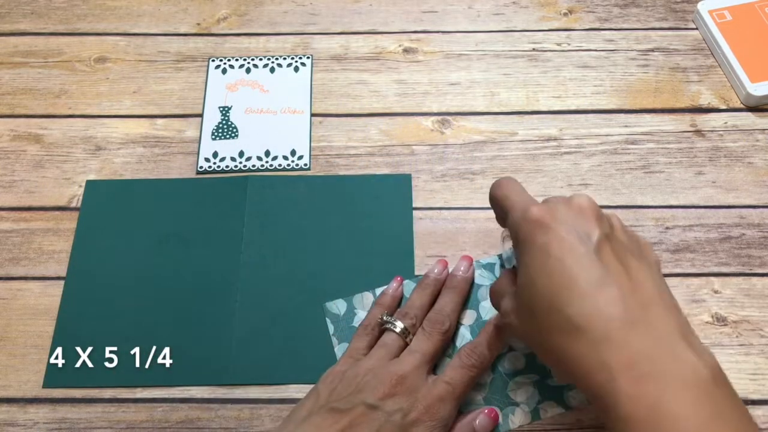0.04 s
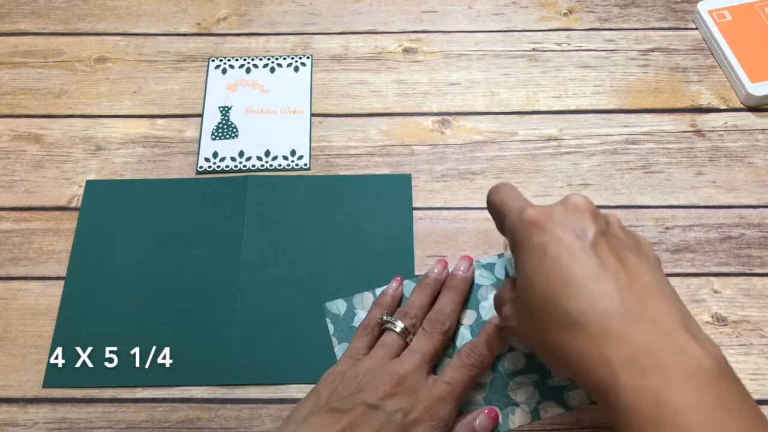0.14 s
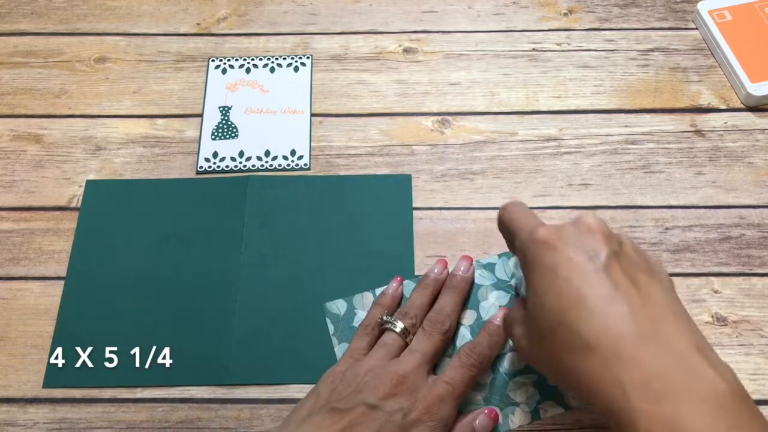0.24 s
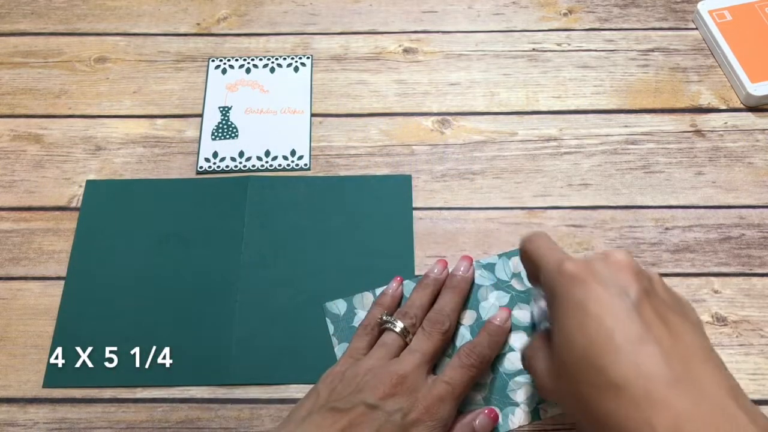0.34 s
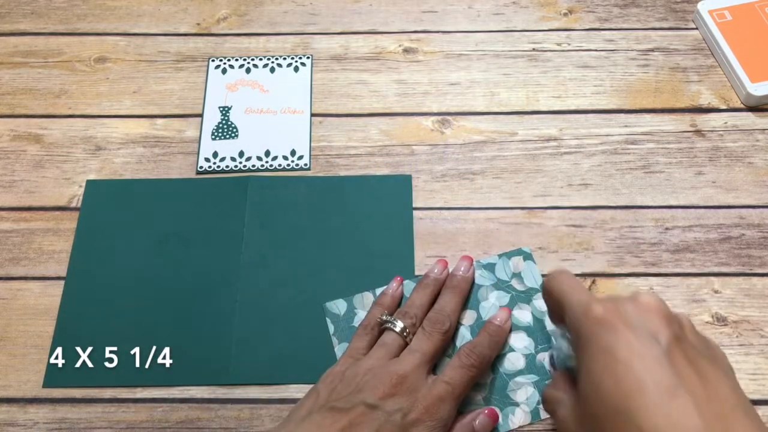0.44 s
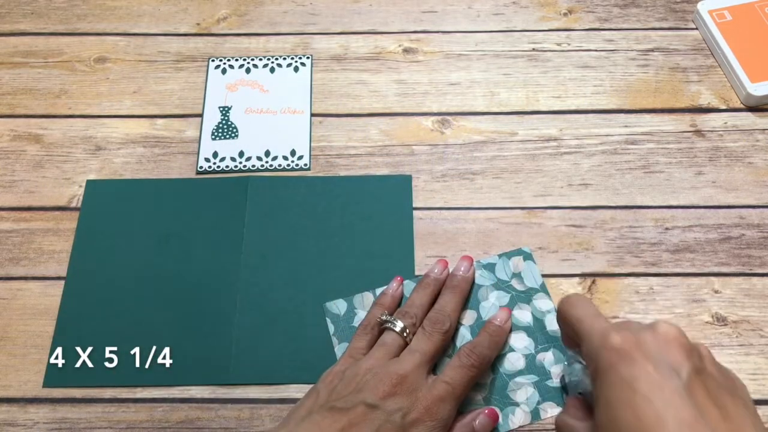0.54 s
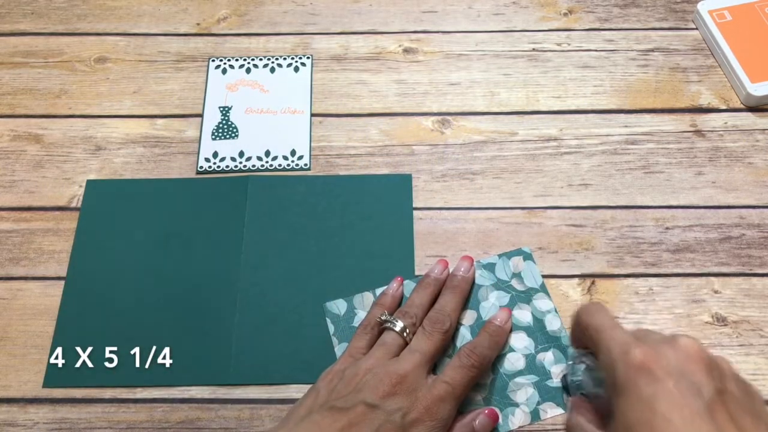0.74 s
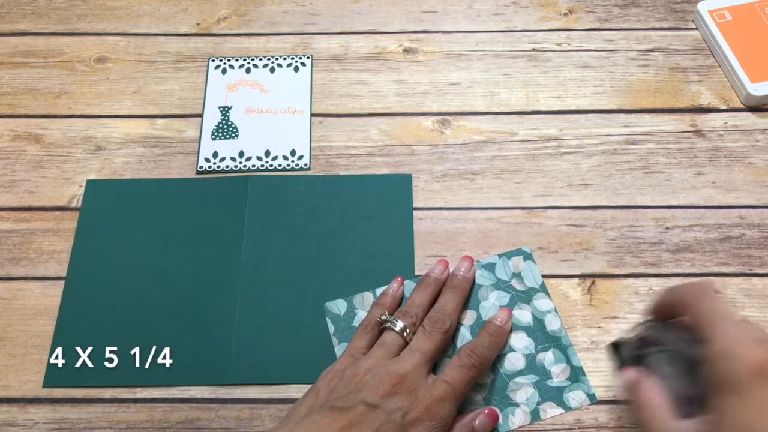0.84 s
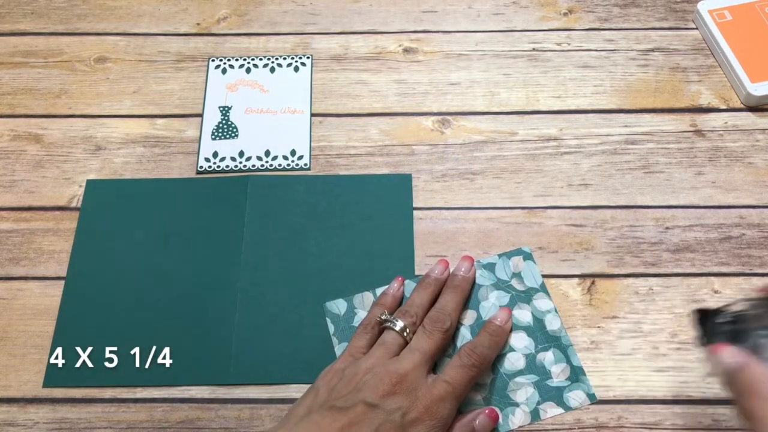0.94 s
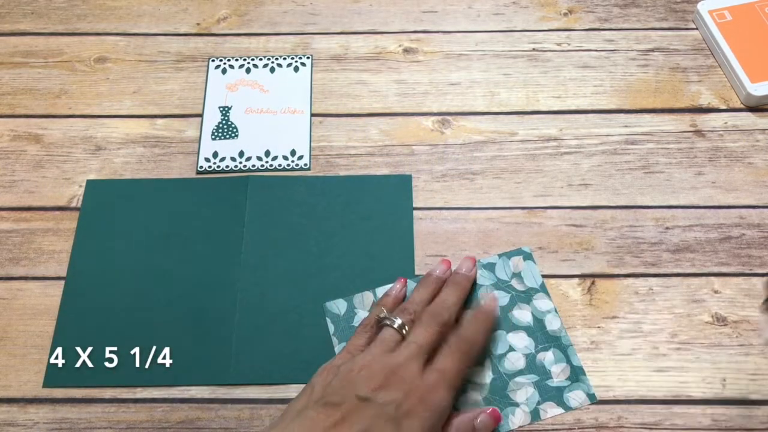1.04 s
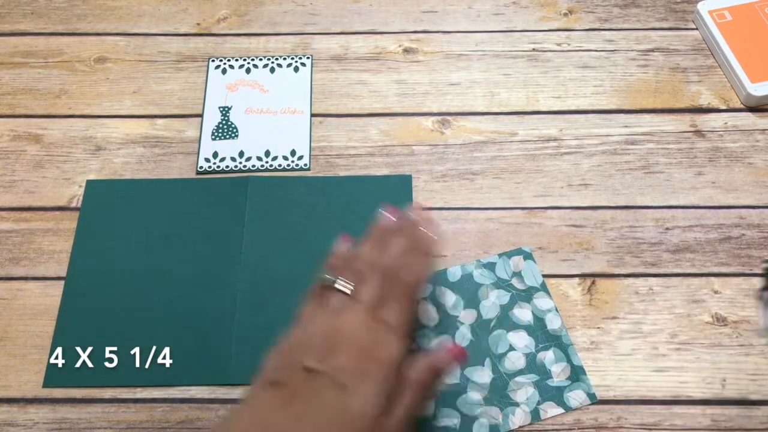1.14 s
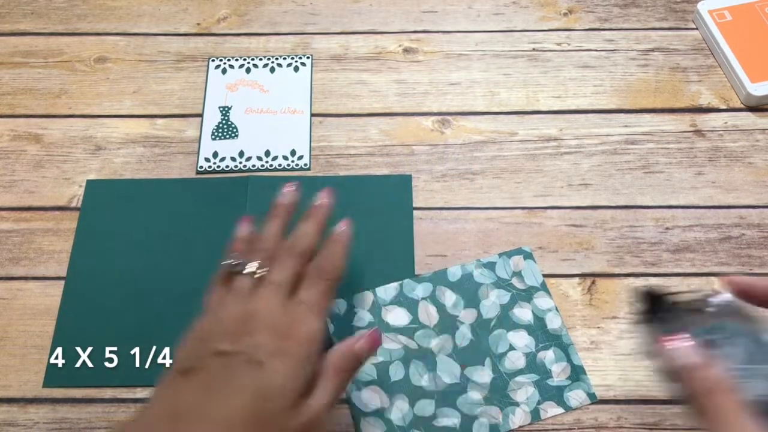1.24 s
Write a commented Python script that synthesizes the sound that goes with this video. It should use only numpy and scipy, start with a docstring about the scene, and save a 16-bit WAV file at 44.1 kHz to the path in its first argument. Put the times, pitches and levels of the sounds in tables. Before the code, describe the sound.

A small hand tool scrapes briefly along paper on a wooden table, then ticks lightly.

```python
"""Light rubbing, a thin squeak and small ticks, then one short, raspy scrape in a small room.
A small plastic hand tool is set down, nudged and dragged along the edge of a card panel on a wooden
table. It sticks and slips through one stroke that speeds up and slows again; each slip snaps, rasps
and rings the tool. Light taps and rustles follow as it lifts off, and a hand slides softly away."""
import sys
import numpy as np
from scipy import signal
from scipy.io import wavfile
from scipy.ndimage import map_coordinates

SR = 44100
rng = np.random.default_rng(int(sys.argv[2]) if len(sys.argv) > 2 else 0)


def pcm_store(signal):
    """Save signal as 16-bit PCM."""
    levels = np.round(np.clip(np.atleast_2d(signal), -1, 1) * 32767)
    wavfile.write(sys.argv[1], SR, levels.astype(np.int16).T)


N = 57330
TIME = np.arange(N) / SR
BRIEF = np.arange(2048) / SR  # time axis of one short sound, in seconds
TAP_RISE_S = .001


def amp(db):
    """Turns decibels into a gain to multiply by."""
    return 10 ** (np.asarray(db) / 20)


def unit(x):
    """Scales a sound to an average (rms) level of 1."""
    return x / np.sqrt(np.mean(x ** 2) + 1e-20)


def unit_burst(x):
    """Scales a short sound to the energy of 7 ms at level 1."""
    return x / np.sqrt(np.sum(x ** 2) / (.007 * SR) + 1e-20)


def along(table, s):
    """Reads each column of a table at the times s, gliding between rows."""
    times, *columns = np.transpose(table)
    return [np.interp(s, times, column) for column in columns]


def across(table, hz):
    """Reads a table at the frequencies hz, with octaves evenly spaced."""
    frequencies, values = np.transpose(table)
    return np.interp(np.log(hz + 1), np.log(frequencies), values)


def colour(x, db_at):
    """Turns each frequency up or down by db_at(hz) decibels, with no ringing ahead of the sound."""
    hz = abs(np.fft.fftfreq(4096, 1 / SR))
    log_gain = np.log(amp(db_at(hz)))
    spectrum = np.exp(np.conj(signal.hilbert(log_gain)))
    response = np.fft.ifft(spectrum).real[:len(BRIEF)]
    return signal.fftconvolve(x, response)[:len(x)]


def shaped(x, table):
    """Colours a sound by a table of frequencies and levels."""
    return colour(x, lambda hz: across(table, hz))


def add(mix, s, sound):
    """Mixes a sound in, starting at s seconds."""
    part = mix[max(round(s * SR), 0):][:len(sound)]
    part += sound[:len(part)]


def fibres(size, clicks_per_s=7000, spread_db=3):
    """Paper fibres catch and let go, making dense clicks of uneven size."""
    hits = rng.random(size) < clicks_per_s / SR
    signs = rng.choice([-1., 1.], size)
    return hits * signs * amp(spread_db * np.minimum(rng.exponential(1, size), 3))


def rubbing():
    """Tool and fingers slide lightly over the card's fibres."""
    # strength of the rubbing: t/s, body level/dB, hiss level/dB
    levels = [(0, -46, -57), (.061, -58.5, -62), (.067, -45.5, -48.5), (.1, -49, -65), (.128, -41, -81),
              (.145, -55.5, -88), (.1845, -60, -73), (.186, -48.5, -60.5), (.235, -40, -47.5),
              (.46, -36, -40.5), (.615, -38, -50), (.645, -46.5, -52), (.73, -66, -100), (.765, -42.5, -84),
              (.802, -95, -86), (.808, -51, -57), (.875, -62.5, -68), (.895, -96, -112),
              (1.1, -84.5, -81.5), (1.117, -71, -64), (1.15, -82.5, -81)]
    # tone of the rubbing's body: f/Hz, level/dB
    body_colour = [(200, -26), (600, -11.5), (1100, -14.5), (1450, 6.5), (1900, 4.5), (2250, 1), (2700, 4),
                   (3300, -0.5), (4200, 1), (5000, 2.5), (6300, -14), (16000, -35)]
    # tone of its hiss: f/Hz, level/dB
    hiss_colour = [(1000, -30), (4000, 0), (6000, 3.5), (8500, -3), (11500, -3.5), (13500, 0), (16000, -11)]
    body_db, hiss_db = along(levels, TIME)
    body = amp(body_db) * unit(shaped(fibres(N), body_colour))
    hiss = amp(hiss_db) * unit(shaped(fibres(N), hiss_colour))
    return body + hiss


def band_noise(low_hz, high_hz):
    """Noise between two frequencies, at level 1."""
    band = signal.butter(2, [low_hz, high_hz], "band", fs=SR, output="sos")
    return unit(signal.sosfilt(band, rng.standard_normal(N)))


def squeak(end_s=.11, db=-52, hz=2630, width_hz=120):
    """The tool's edge rubs with a thin squeak that fades as it settles."""
    fade = np.sqrt(np.maximum(1 - (TIME / end_s) ** 2, 0))
    return amp(db) * fade * band_noise(hz - width_hz / 2, hz + width_hz / 2)


def background(still_db=-67.5):
    """Shifting hands sound dully through the table, over the hush of the room."""
    # strength of the hand noise: t/s, level/dB
    hand_levels = [(0, -53), (.18, -64), (.26, -55.5), (.56, -56), (.66, -62.5), (.9, -66), (1.29, -69)]
    # its dull tone: f/Hz, level/dB
    hand_colour = [(25, -36.5), (60, -14.5), (110, -2.5), (200, 2), (420, -2), (700, -11.5), (1200, -26.5),
                   (4000, -46.5)]
    # tone of the still room: f/Hz, level/dB
    still_colour = [(20, -37), (70, -18.5), (110, 3), (200, -2), (400, -16.5), (2000, -20), (9000, -31.5),
                    (16000, -46)]
    hands = amp(along(hand_levels, TIME)[0]) * unit(shaped(rng.standard_normal(N), hand_colour))
    return hands + amp(still_db) * unit(shaped(rng.standard_normal(N), still_colour))


def taps(crack_db=-24):
    """Tool and fingernails tick dryly, each tick a puff of noise around one pitch."""
    # the ticks: t/s, level/dB, centre f/Hz, width/octaves, decay/s
    ticks = [(0.0633, -47, 4340, 0.32, 0.0019), (0.0805, -52, 650, 0.27, 0.0013),
             (0.7097, -36, 2970, 0.17, 0.00043), (0.7306, -43, 2850, 0.21, .0016),
             (0.731, -51.5, 6600, 0.15, 0.00084), (0.7418, -40.5, 2750, 0.58, 0.004),
             (.744, -54.5, 520, 0.24, 0.014), (0.7434, -45.5, 9900, 0.18, 0.0038),
             (0.7554, -51, 3000, 0.96, 0.0017), (0.7891, -46, 2500, 0.37, 0.0027),
             (0.8376, -41, 6600, 0.38, 0.0022), (0.857, -48.5, 5840, 0.055, 0.00073),
             (0.867, -50, 5500, 0.056, 0.00025), (0.874, -56, 6730, 0.39, 0.00099),
             (0.8742, -52, 2840, 0.24, 0.0037), (.919, -57.5, 6260, 0.32, 0.0018),
             (1.115, -58, 13090, 0.21, 0.0036)]
    out = np.zeros(N)
    for s, db, centre_hz, octaves, decay_s in ticks:
        def hump(hz):
            """One resonance with a broad, faint crack around it, in dB."""
            octaves_away = np.log2((hz + 1) / centre_hz)
            peak = np.exp(-.5 * (octaves_away / octaves) ** 2)
            crack = amp(crack_db) / (1 + (octaves_away - .5) ** 4)
            return 20 * np.log10(peak + crack)
        puff = envelope(TAP_RISE_S, TAP_RISE_S, decay_s) * rng.standard_normal(len(BRIEF))
        add(out, s, amp(db) * unit_burst(colour(puff, hump)))
    return out


def envelope(rise_s, hold_until_s, decay_s):
    """The outline of a short sound: it rises, holds and dies away."""
    return np.minimum(BRIEF / rise_s, 1) * np.exp(-np.maximum(BRIEF - hold_until_s, 0) / decay_s)


def flurry(rise_s, hold_until_s, decay_s, stretch=1):
    """A brief rush of fibre clicks; stretch multiplies its length."""
    return fibres(len(BRIEF)) * envelope(stretch * rise_s, stretch * hold_until_s, stretch * decay_s)


def ringing(modes):
    """A struck object rings at its own tones (modes); the wider a mode, the sooner it dies."""
    return sum(amp(db) * np.exp(-np.pi * width_hz * BRIEF) * np.sin(2 * np.pi * hz * BRIEF)
               for hz, width_hz, db in modes)


def slip(ring_db, rasp_db, snap_db, stretch=1):
    """The tool lets go with a bright snap, rasps forward and rings."""
    # tones of the tool on the card: f/Hz, width/Hz, level/dB
    tool_modes = [(1490, 110, 0.5), (1820, 195, 5)]
    # tone of the rasp: f/Hz, level/dB
    rasp_colour = [(40, -66.5), (300, -26.5), (1000, -18), (1400, -12), (2000, -4.5), (2350, -12),
                   (2700, -2.5), (3150, 1), (3800, -4), (4800, -3.5), (5250, -5), (5850, -2.5), (6500, -19),
                   (8500, -13), (11000, -21), (16000, -38.5)]
    # tone of the snap: f/Hz, level/dB
    snap_colour = [(40, -37.5), (300, -19), (2000, -1.5), (5000, -16.5), (6800, 7.5), (7400, 0.5),
                   (8500, 9.5), (10000, -4), (12000, 6.5), (16000, 5.5)]
    drift = .047  # the tones shift by up to this share from slip to slip as the contact moves
    modes = [(hz * (1 + drift * rng.uniform(-1, 1)), width, db) for hz, width, db in tool_modes]
    low_cut = signal.butter(6, 1236, "high", fs=SR, output="sos")  # a small tool gives off little bass
    body = signal.sosfilt(low_cut, ringing(modes))
    ring = signal.fftconvolve(flurry(.002, .0037, .0007), body)[:len(BRIEF)]
    rasp = shaped(flurry(.0015, .0043, .0012, stretch), rasp_colour)
    snap = shaped(flurry(.0004, .0025, .0017, stretch), snap_colour)
    return (amp(ring_db) * unit_burst(ring) + amp(rasp_db) * unit_burst(rasp)
            + amp(snap_db) * unit_burst(snap))


def scrape(start_s=.2394, end_s=.62):
    """A few nudges, then a run of slips that lengthen and merge in the fast part of the stroke."""
    # small slips as the tool settles: t/s, ring level/dB, rasp level/dB, snap level/dB
    nudges = [(0.097, -40.5, -54.5, -83.5), (0.1134, -39, -60, -66), (0.1206, -38.5, -41.5, -65.5),
              (0.2281, -36, -54, -43)]
    # speed of the stroke: t/s, slip rate/Hz
    slip_rate = [(.24, 52.22), (.2805, 40.54), (.3229, 59.93), (.3481, 86.27), (.401, 73.86),
                 (.4364, 101.92), (.5062, 99.26), (.5351, 83.35), (.562, 77.55), (.615, 39.09)]
    # slips along the stroke: t/s, ring level/dB, rasp level/dB, snap level/dB, stretch/times
    strength = [(.24, -30, -29.5, -33, .9), (.285, -27.5, -30.5, -32.5, 1), (.322, -27, -25.5, -31, 1.1),
                (.35, -21, -26, -33, .85), (.40, -32, -25, -33.5, 1.2), (.46, -31.5, -24.5, -37.5, 2.1),
                (.52, -37, -24.5, -38.5, 1.8), (.562, -36.5, -30, -35.5, 1.3),
                (.612, -30.5, -28.5, -32, .9)]
    out = np.zeros(N)
    t = np.arange(start_s, end_s, 1 / SR)
    slips_so_far = np.cumsum(along(slip_rate, t)[0]) / SR
    slip_times = np.interp(np.arange(int(slips_so_far[-1]) + 1), slips_so_far, t)
    for s in slip_times:
        add(out, s, slip(*along(strength, s)))
    for s, *levels in nudges:
        add(out, s, slip(*levels))
    return out


def plastic_clicks(lift_s=.7445, lift_db=-40):
    """The hardest catches click briefly; lifted off the card, the tool rings longer."""
    # hard catches during the stroke: t/s, level/dB
    catches = [(.3388, -25.5), (0.3514, -27.5), (0.3647, -24.5), (.4368, -32.5)]
    # the sharp tones they set off: f/Hz, width/Hz, level/dB
    catch_modes = [(3460, 110, -0.5), (4890, 350, -3), (6750, 300, -5.5)]
    # tones of the freed tool: f/Hz, width/Hz, level/dB
    free_modes = [(2560, 38, 0.82), (3580, 51, 1), (5120, 60, -1.1)]
    out = np.zeros(N)
    soft_ends = np.minimum(np.minimum(BRIEF, BRIEF[::-1]) / TAP_RISE_S, 1)
    for s, db in catches:
        add(out, s, amp(db) * unit_burst(soft_ends * ringing(catch_modes)))
    add(out, lift_s, amp(lift_db) * unit_burst(soft_ends * ringing(free_modes)))
    return out


def hand_sweep(start_s=1.09, rise_s=.072, db=-62):
    """The hand slides away over the table with a low, soft swell."""
    swell = np.clip((TIME - start_s) / rise_s, 0, 1)
    return amp(db) * swell * band_noise(low_hz=189, high_hz=315.4)


def card_echoes(x, count=4, shortest_s=.0009, spread_s=.0013, echo_db=-16):
    """Waves bounce back from the card's edges; the tiny delays drift as the contact point moves."""
    out = x.copy()
    for start, end, coin_toss in rng.random((count, 3)):
        delay_s = shortest_s + spread_s * (start + (end - start) * TIME / TIME[-1])
        echo = map_coordinates(x, [(TIME - delay_s) * SR], order=3)
        out += np.sign(coin_toss - .5) * amp(echo_db) * echo
    return out / np.sqrt(1 + count * amp(echo_db) ** 2)


def room(x, delay_s=.005):
    """The small room adds a short wash of echoes whose highest treble dies first."""
    # how long the echoes take to fall by 60 dB: f/Hz, t/s
    fade_times = [(200, 0.38), (800, 0.093), (1600, 0.25), (5000, 0.55), (8000, 0.13), (16000, 0.052)]
    # tone of the echoes: f/Hz, level/dB
    echo_colour = [(800, -11), (1600, -7.5), (5000, -17.5), (8000, -12.5), (16000, -22.5)]
    hz, t, noise = signal.stft(rng.standard_normal(SR // 2), SR, nperseg=256)
    fade_s = across(fade_times, hz)[:, None]
    fade = np.exp(-np.log(1000) * t / fade_s)
    even_energy = np.sqrt(2 * np.log(1000) / (fade_s * SR))  # a longer fade adds no energy
    gain = amp(across(echo_colour, hz))[:, None]
    tail = signal.istft(noise * gain * fade * even_energy, SR, nperseg=256)[1]
    out = np.zeros(N)
    add(out, delay_s, signal.fftconvolve(x, tail))
    return out


def scene():
    """The work on the table and the room around it, in one channel."""
    near = card_echoes(scrape() + rubbing() + squeak() + taps() + plastic_clicks())
    return (near + room(near) + background() + hand_sweep())[None]


def record(dry):
    """Cuts away the very highest treble."""
    top_hz = 16100
    treble_cut = signal.firwin(511, top_hz, window=("kaiser", 9), fs=SR)
    return signal.oaconvolve(dry, treble_cut[None], "same")


dry = scene()
out = record(dry)
pcm_store(out)
```